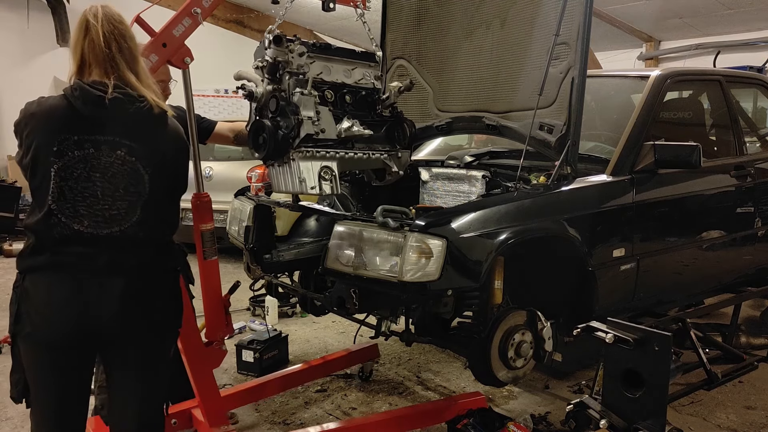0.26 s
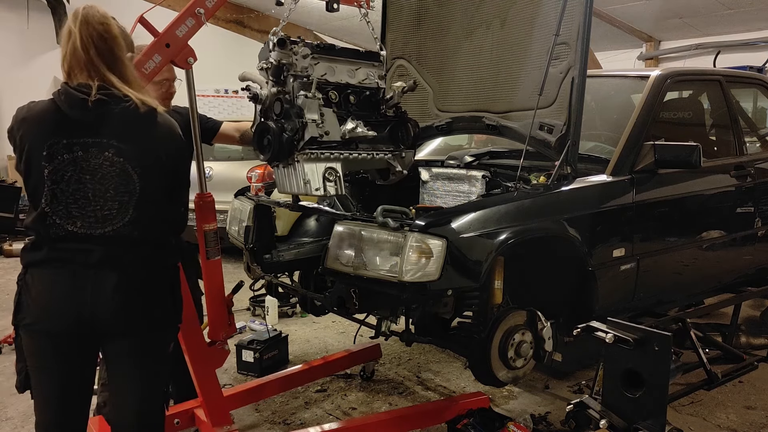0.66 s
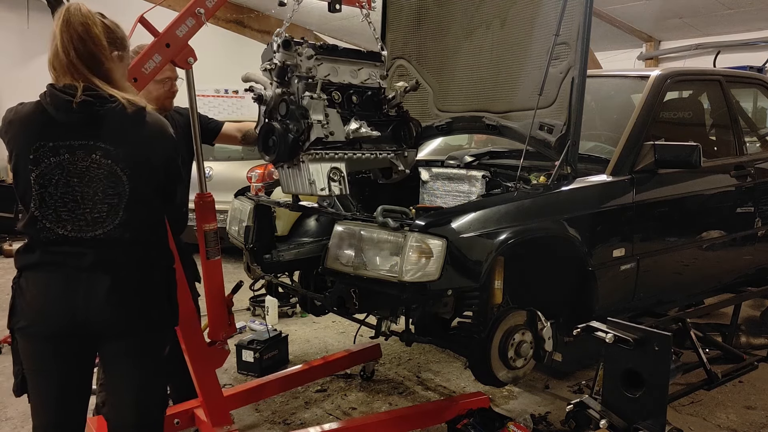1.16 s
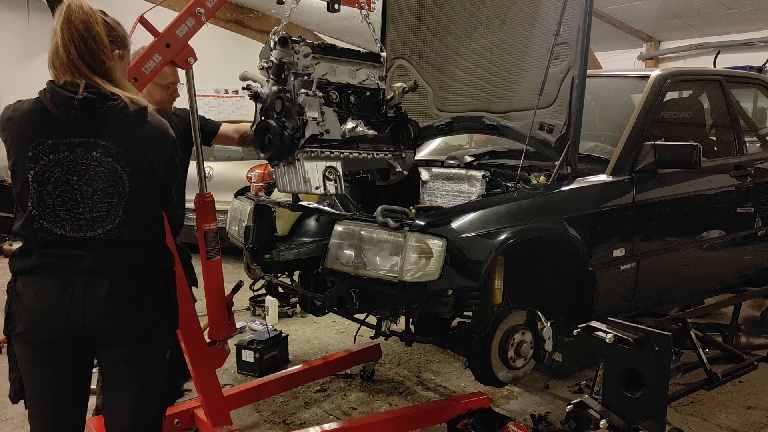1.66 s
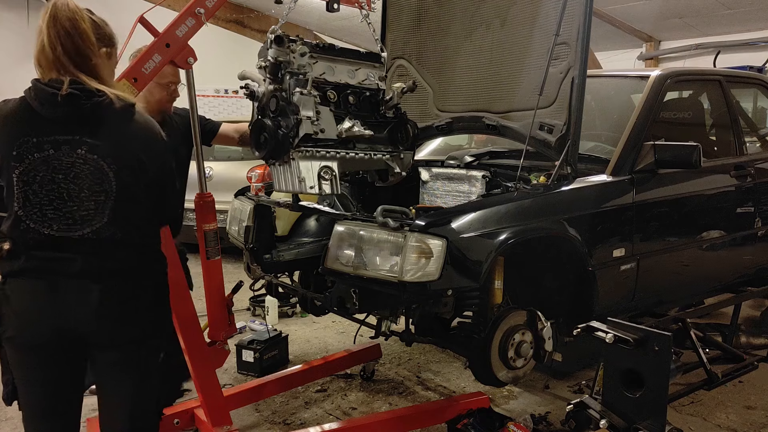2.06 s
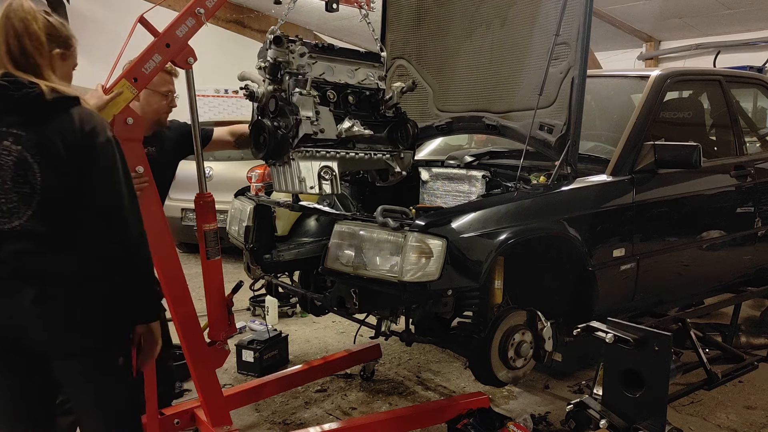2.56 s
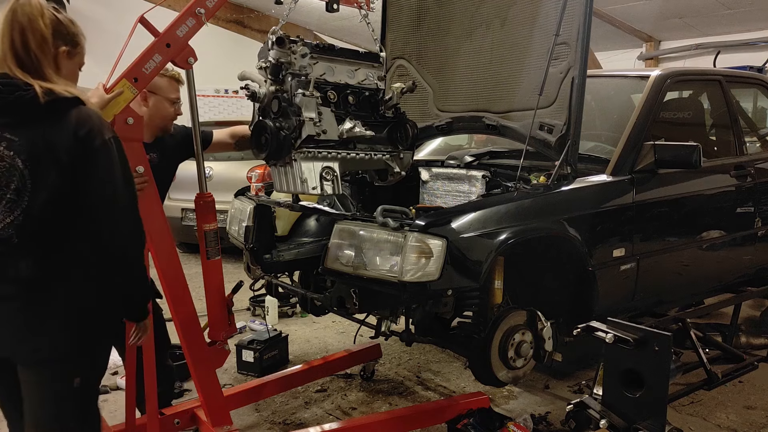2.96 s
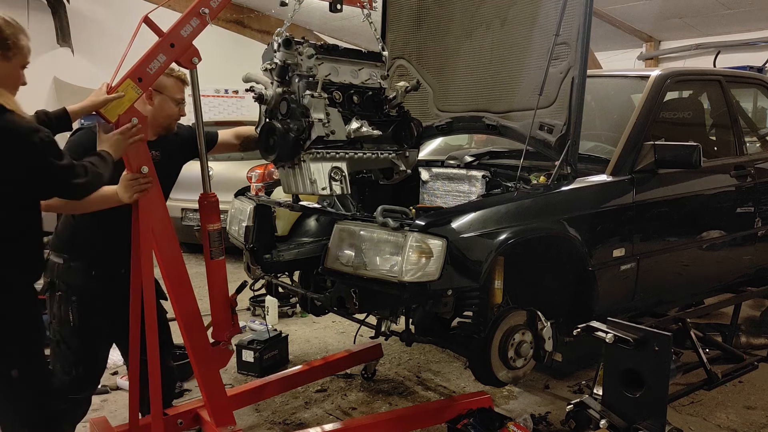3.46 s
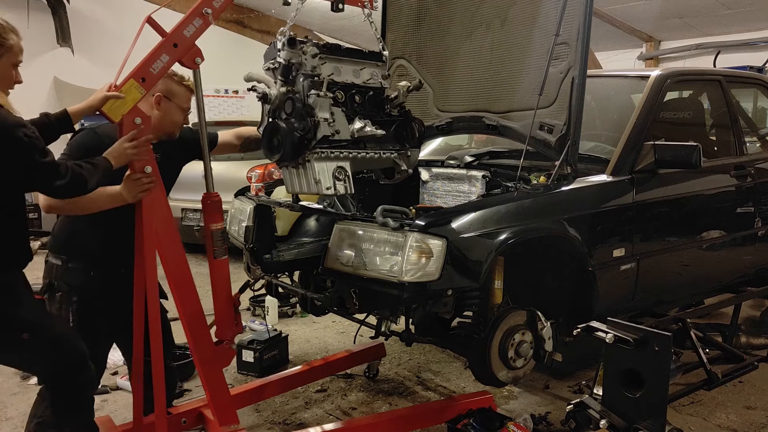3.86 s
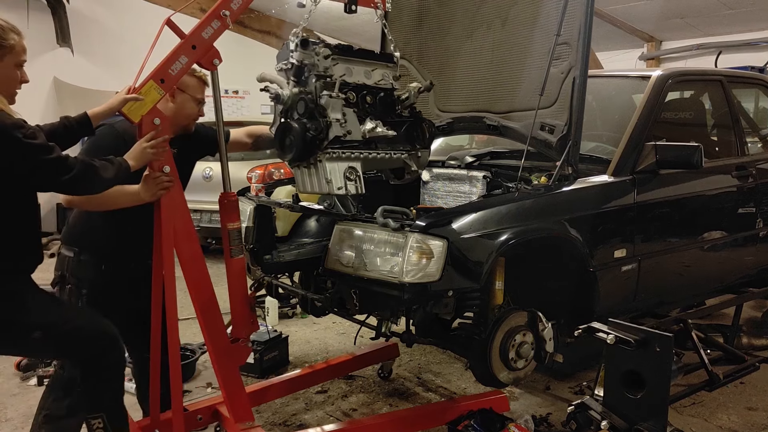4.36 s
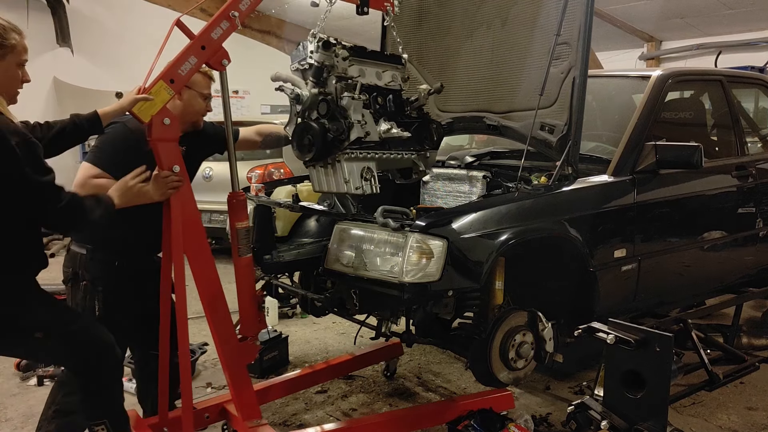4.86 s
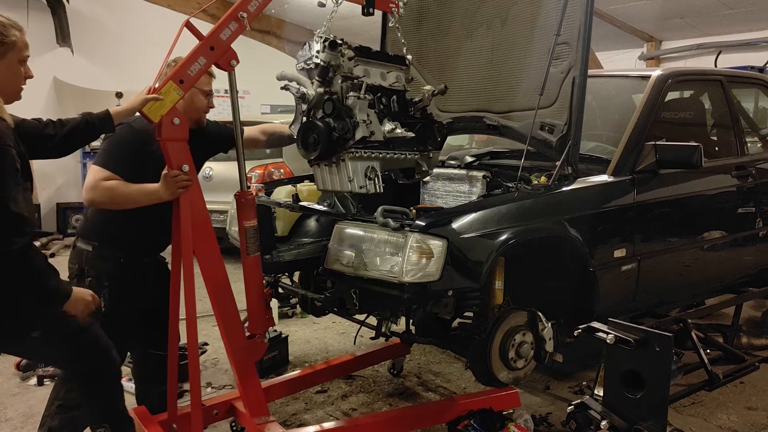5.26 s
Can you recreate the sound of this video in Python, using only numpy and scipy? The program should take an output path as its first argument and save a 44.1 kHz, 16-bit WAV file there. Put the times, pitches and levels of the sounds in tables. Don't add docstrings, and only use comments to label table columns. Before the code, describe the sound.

In a small bare-walled workshop, a rolling engine hoist jolts with a quick cluster of metal knocks, boot thump and thin squeaks. Sparse, faint hook clinks follow over a low hum. Then the casters drag again, a hard heel lands, and a loud clank of engine and frame breaks into rattles and scrapes. Stereo pickup from about three metres, crane slightly left.

```python
import sys
import numpy as np
from scipy import signal
from scipy.fft import rfft, irfft, next_fast_len
from scipy.io import wavfile
from scipy.ndimage import uniform_filter1d

SR = 44100
rng = np.random.default_rng(int(sys.argv[2]) if len(sys.argv) > 2 else 0)


def decibels_to_gain(level_db):
    exponent = np.asarray(level_db, float) / 20
    return 10 ** exponent


def unload_wav(signal):
    wavfile.write(
        sys.argv[1],
        SR,
        np.round(np.clip(np.atleast_2d(signal).T, -1, 1) * 32767).astype(np.int16),
    )


N = 243255

# start in seconds, hold in seconds, grind level in dB, rumble in dB, brightness in dB.
PUSHES = [(0.278, 0.071, -54, -0.5, 2.5), (0.435, 0.11, -73, 1, 1), (2.551, 0.33, -90, 3, 13),
          (3.025, 0.039, -99, 6, 19.5), (3.163, 0.035, -58, -6, -2), (3.406, 0.048, -72, -12, 4),
          (3.957, 0.033, -52, 4, 1), (4.041, 0.038, -38, -7.5, -1.5), (4.128, 0.11, -50, -15, 2),
          (4.347, 0.15, -91.5, 14.5, 21), (4.592, 0.2, -54, -4.5, -0.5), (4.87, 0.091, -66.5, -24, 4),
          (5.088, 0.019, -43.5, -11, -3), (5.208, 0.079, -63, 2, 1.5), (5.255, 0.06, -57.5, -10.5, -6)]


def rms(x):
    return np.sqrt(np.mean(x ** 2))


def through(x, response):
    return signal.fftconvolve(np.atleast_2d(x), np.atleast_2d(response), axes=1)[:, :N]


def band(x, edges_hz, kind, order):
    return signal.sosfilt(signal.butter(order, edges_hz, kind, fs=SR, output="sos"), x)


def shade(points, hz):
    point_hz, value = np.transpose(points)
    return np.interp(np.log(np.maximum(hz, 1)), np.log(point_hz), value)


def colour(x, points):
    size = next_fast_len(N)
    hz = np.arange(size // 2 + 1) * SR / size
    return irfft(rfft(x, size) * decibels_to_gain(shade(points, hz)), size)[..., :N]


def ring(modes, apart_hz=2000, rise_s=0.000083, count=1):
    hz, db, t60_s = np.transpose(modes)[:, :, None]
    t = np.arange(SR // 4) / SR
    swing = np.exp((2j * np.pi * hz - np.log(1000) / np.clip(t60_s, 0.01, 0.22)) * t)
    bodies = []
    for start, turn in rng.uniform(-np.pi, np.pi, (count, 2, len(modes), 1)):
        turn = turn * np.clip(hz / apart_hz, 0, 1) * 0.37
        weight = decibels_to_gain(db) * np.exp(1j * (start + turn * [1, -1]))
        both = np.imag(weight.T @ swing) * (1 - np.exp(-t / rise_s))
        bodies.append(both / (2 * rms(both[:, :SR // 200])))
    return bodies if count > 1 else bodies[0]


def steady(response):
    return response / np.sqrt(np.mean(np.sum(response ** 2, axis=1)))


def chatter(start_s, db, length_s, rise_s):
    out = np.zeros(N + SR)
    t = np.arange(SR // 6) / SR
    rise_s = rise_s + 0 * start_s
    contacts = rng.laplace(size=(len(start_s), len(t)))
    for s, gain, length, swell, grains in zip(start_s - 0.0015, decibels_to_gain(db), length_s, rise_s, contacts):
        push = grains * (1 - np.exp(-t / swell)) * np.exp(-t / max(length, 0.0002))
        at = int(s * SR)
        out[at:at + len(t)] += gain * push / np.sqrt(np.sum(push ** 2))
    return out[:N]


def tapped(taps, modes, length_s):
    s, db = np.transpose(taps)
    return through(chatter(s, db, length_s + 0 * s, length_s), ring(modes, rise_s=0.00037))


def walk(rate_hz):
    k = int(SR / rate_hz)
    return uniform_filter1d(np.repeat(rng.standard_normal(N // k + 1), k), k)[:N]


def drag(db, rough_db, rate_hz):
    return decibels_to_gain(db + rough_db * walk(rate_hz)) * rng.standard_normal(N)


def effort(s, hold_s, db, rise_db_s, fall_db_s):
    s, hold_s, db, fall_db_s = (np.reshape(v, (-1, 1)) for v in (s, hold_s, db, fall_db_s))
    t = np.arange(0, N, 32) / SR
    before_s = np.maximum(s - t, 0)
    after_s = np.maximum(t - s - np.abs(hold_s), 0)
    level = db - rise_db_s * before_s - np.abs(fall_db_s) * after_s
    return np.interp(np.arange(N) / SR, t, level.max(axis=0))


def pushing(lean_db):
    s, hold_s, db = np.transpose(PUSHES)[:3]
    return effort(s, hold_s, db + lean_db, rise_db_s=303, fall_db_s=158)


def shop():
    # frequency in Hz, density in dB per Hz.
    air_shape = [(25, -9), (55, -5.5), (80, -23.5), (160, -20.5), (300, -29.5), (700, -32), (1250, -36),
                 (1800, -36.5), (3200, -38.5), (5100, -40), (7000, -51), (11200, -40.5), (13000, -49),
                 (15600, -36.5), (16500, -42)]
    # time in seconds, level in dB.
    blower = [(0.0, -69.5), (0.23, -59.5), (0.68, -75.5), (1.03, -70.5), (1.858, -78.5), (2.18, -86),
              (2.589, -78.5), (3.89, -76.5), (4.02, -65), (4.451, -76.5), (4.81, -69.5), (5.52, -77)]
    air_db, hum_db, hum_hz, hum_width_hz = -71.5, -62.5, 44.0, 7.9
    t = np.arange(N) / SR
    mid, side = colour(rng.standard_normal((2, N)), air_shape)
    side = side - uniform_filter1d(side, size=60) * 0.37
    air = np.array([mid + side, mid - side]) * decibels_to_gain(walk(2.9))
    upper = air - uniform_filter1d(air, size=400)
    drone = 0.5 * np.sin(2 * np.pi * hum_hz * t)
    edges_hz = [hum_hz - hum_width_hz / 2, hum_hz + hum_width_hz / 2]
    throb = band(rng.standard_normal(N), edges_hz, "band", 2)
    hum = decibels_to_gain(hum_db) * (drone + 0.5 * throb / rms(throb))
    blower_db = np.interp(t, *np.transpose(blower))
    rumble = band(drag(blower_db, rough_db=3.0, rate_hz=17.0), [60, 150], "band", 2)
    return air * decibels_to_gain(air_db) / rms(upper) + decibels_to_gain(22.5) * rumble + hum


def boots():
    # start in seconds, peak in dB.
    steps = [
        (0.139, -19.5),
        (2.38, -26),
        (2.71, -39),
        (3.084, -70),
        (3.531, -55),
        (3.88, -12.5),
    ]
    slab_hz, slab_t60_s, sand_db = 512, 0.051, -27
    out = np.zeros(N + SR)
    t = np.arange(SR // 8) / SR
    spreads = rng.uniform(-1.021, 1, (len(steps), 2, 40, 1))
    sands = rng.standard_normal((len(steps), len(t)))
    for (s, db), (spread, start), sand in zip(steps, spreads, sands):
        fade = decibels_to_gain(1.3 * spread - 60 * t / slab_t60_s)
        mode_hz = slab_hz * 2 ** (1.3 * spread)
        knock = np.sum(np.sin(2 * np.pi * mode_hz * t + 2.0 * start) * fade, axis=0)
        knock = knock * (1 - np.exp(-t / 0.00027))
        crush = decibels_to_gain(sand_db - 60 * t / 0.25) * uniform_filter1d(sand, size=8)
        at = int((s + 0.00365) * SR)
        out[at:at + len(t)] += decibels_to_gain(db - 6.0) * (knock / np.abs(knock).max() + crush)
    return out[:N]


def grit():
    # start in seconds, peak in dB.
    ticks = [(0.1404, -73), (0.2674, -67), (0.377, -49), (0.5294, -32), (1.333, -64.5), (1.848, -67),
             (2.389, -67), (2.718, -70), (2.949, -58), (3.018, -61), (3.34, -64), (3.527, -68),
             (3.6196, -62.5), (3.9554, -58), (4.066, -58), (4.3171, -65), (4.535, -55), (4.7376, -45),
             (4.885, -52), (5.056, -77), (5.2424, -55), (5.4375, -78)]
    # frequency in Hz, density in dB per Hz.
    tick_shape = [(2000, -44), (4500, -3.5), (7000, 1), (9500, -1), (13000, -7), (15500, -3),
                  (16500, -21.5)]
    # start in seconds, hold in seconds, level in dB.
    scuffs = [(0.373, 0.07, -68), (2.566, 0.24, -78.5), (2.974, 0.021, -70.5), (3.364, 0.1, -80),
              (3.668, 0.02, -93), (4.08, 0.05, -52), (4.342, 0.014, -64), (4.39, 0.04, -70.5),
              (4.89, 0.075, -73), (5.2, 0.11, -70)]
    # frequency in Hz, density in dB per Hz.
    sole_shape = [(2000, -38), (4500, -1), (7000, -3), (10500, -4.5), (11500, -10), (15500, -3)]
    s, db = np.transpose(ticks)
    click = chatter(s, db + 29.5, 0.0006 + 0 * s, rise_s=0.00016) * decibels_to_gain([[1.5], [-1.5]])
    soles_db = effort(*np.transpose(scuffs), rise_db_s=260, fall_db_s=209)
    scuff = np.array([drag(soles_db, rough_db=7.0, rate_hz=47) for port in "LR"]) * decibels_to_gain(11.5)
    return colour(click, tick_shape) + colour(scuff, sole_shape)


def snaps():
    # start in seconds, peak in dB.
    cracks = [(.528, -41), (1.334, -52), (2.7185, -36), (2.772, -44), (2.946, -46), (3.348, -66),
              (3.408, -57), (3.531, -55), (4.553, -52), (4.887, -46)]
    # frequency in Hz, density in dB per Hz.
    crack_shape = [(400, -20), (900, -1), (2500, -3), (5000, 7), (7000, -5.5), (12000, -19.5)]
    s, db = np.transpose(cracks)
    return colour(chatter(s, db + 15, 0.0004 + 0 * s, rise_s=0.0002), crack_shape)


def fittings():
    # frequency in Hz, level in dB, t60 in seconds.
    pin, tray, collar = [(882, -5, 0.29), (902, -0.5, .2), (1358, -11.5, 0.088), (2000, -8, 0.088)], [(563, -7, 0.063), (722, 0, 0.052), (826, 0, 0.068)], [(2096, -0.5, .07), (2340, -6, .05), (1620, -7.5, .07)]
    shackle, race = [(3840, -5.5, .05), (3970, 0.5, 0.063), (4060, -3, 0.055), (5060, -8, .06),
                     (2900, -14.5, .06)], [(11980, 3, 0.044), (13700, -7, .03), (15350, -2, .03)]
    # start in seconds, peak in dB.
    pin_taps, tray_taps, collar_taps = [(.143, -33), (.528, -44), (.585, -52), (4.335, -42), (4.893, -43)], [(3.09, -67), (3.533, -45.5), (3.55, -65),
                                                          (4.083, -23.5)], [(.15, -37), (.275, -45),
                                                                             (.356, -42.5), (2.632, -52),
                                                                             (2.642, -54), (3.4, -58),
                                                                             (4.6, -56), (4.685, -49),
                                                                             (4.95, -47), (5.03, -44),
                                                                             (5.115, -31)]
    shackle_taps, race_taps = [(.143, -35), (.212, -36), (.305, -55), (.35, -46), (3.96, -32), (3.985, -31),
                               (4.03, -44), (4.075, -22), (4.325, -33), (4.35, -46), (4.67, -40),
                               (4.715, -27.5), (4.73, -46), (5.045, -46), (5.105, -34.5), (5.25, -50)], [(.148, -46), (.218, -60), (.272, -59), (.302, -28.5),
                                                     (.33, -57), (5.11, -57.5)]
    out = tapped(pin_taps, pin, length_s=0.00067)
    out = out + tapped(tray_taps, tray, length_s=0.00072)
    out = out + tapped(collar_taps, collar, length_s=0.0026)
    out = out + tapped(shackle_taps, shackle, length_s=0.0024)
    return out + tapped(race_taps, race, length_s=0.0054)


def loose_parts():
    # frequency in Hz, level in dB, t60 in seconds.
    lever, eye, strut = [(892, -0.5, 0.098), (1103, -6.5, 0.076), (2060, -9.5, 0.044)], [(778, -10, 0.14), (861, -7, 0.11), (1123, -1.5, 0.1)], [(970, -10, .1), (1247, -23, 0.062), (1314, -12.5, .12),
                                                     (1398, 3.5, 0.11), (1479, -1.5, 0.049),
                                                     (1525, -5, 0.25), (1809, -14, 0.057),
                                                     (2090, -8.5, 0.2), (3800, -10, .08)]
    leg, block = [(167, 6.5, 0.1), (237, -1.5, 0.16), (300, -1, 0.073), (428, -3, 0.19), (483, 1.5, 0.13),
                  (580, -3, 0.038), (671, -4, 0.36)], [(229, -10, 0.18), (788, 0.5, 0.06), (960, -20, 0.25), (1190, -27, .2),
                               (1430, -25, .08), (1550, -1.5, 0.19), (1800, -10, 0.19), (1990, -5, 0.25),
                               (2060, -12, 0.27), (2230, 2, 0.1), (2430, -7.5, 0.11), (2838, -4, 0.16),
                               (3960, -6, 0.074), (4170, -22, 0.07)]
    # start in seconds, peak in dB.
    raps, eye_taps, strut_taps = [(.142, -28), (.528, -38.5), (.272, -30), (3.536, -55.5), (4.331, -33),
                                  (4.89, -36.5)], [(.79, -67), (1.065, -57.5), (1.1, -57), (1.21, -64),
                                                (1.248, -55), (1.485, -61), (1.52, -62), (1.66, -61.5),
                                                (1.86, -66), (2.03, -62.5), (3.83, -52), (4.335, -32.5),
                                                (4.9, -41)], [(.21, -37), (.272, -41), (.336, -34.5),
                                                                  (2.718, -48), (2.75, -53), (2.945, -45),
                                                                  (2.967, -65), (3.174, -36), (3.19, -37),
                                                                  (3.206, -51), (3.27, -59), (3.445, -52),
                                                                  (3.93, -43), (4.66, -35), (4.722, -26),
                                                                  (4.8, -49), (4.95, -46), (5.062, -43),
                                                                  (5.1, -30.5), (5.14, -31), (5.18, -32),
                                                                  (5.27, -39), (5.33, -40)]
    leg_taps, block_taps = [(2.385, -51), (3.54, -62), (3.886, -34), (3.92, -34), (4.095, -26),
                            (4.62, -45.5), (4.77, -38), (5.15, -38.5), (5.18, -35), (5.29, -57)], [(4.077, -17), (4.087, -15), (4.106, -21), (4.13, -25),
                                              (4.16, -27.5)]
    out = tapped(raps, lever, length_s=0.00015)
    out = out + tapped(eye_taps, eye, length_s=0.0045)
    out = out + tapped(strut_taps, strut, length_s=0.00096)
    out = out + tapped(leg_taps, leg, length_s=0.00031)
    return out + tapped(block_taps, block, length_s=0.0011)


def axles():
    # start in seconds, level in dB, fade in dB per second.
    squeaks = [(0.147, -51, 296), (0.217, -42, 900), (0.271, -36.5, 1514), (0.301, -35.5, 302),
               (3.149, -54, 300), (3.184, -48, 801), (3.94, -50, 297), (3.977, -40.5, 550),
               (4.109, -43, 232), (4.228, -50, 693), (4.326, -57, 209), (4.539, -60.5, 156),
               (4.672, -50, 407), (4.718, -44, 346), (5.058, -43, 456), (5.109, -36, 420), (5.36, -53, 920),
               (5.41, -61, 137)]
    # frequency in Hz, level in dB, t60 in seconds.
    axle_modes = [(9410, 13.5, 0.033), (9574, 9.5, 0.023), (9255, 5.5, .03), (10200, -21, 0.036),
                  (10500, -17, 0.032), (12400, -5.5, 0.036), (11800, -15, .04), (13400, -17, .04),
                  (13700, -1.5, 0.022), (15400, 4.5, 0.035), (15500, -2, 0.039)]
    s, db, fade_db_s = np.transpose(squeaks)
    slip_db = effort(s, 0, db, 1213, fade_db_s)
    sing_db = pushing(-9.5)
    slips = drag(np.maximum(slip_db, sing_db), rough_db=4.5, rate_hz=60)
    body = ring(axle_modes, apart_hz=60500, rise_s=0.0012)
    return through(slips, steady(body)) * decibels_to_gain([[1.5], [-6.0]])


def frame():
    # start in seconds, peak in dB, thud in dB, clank in dB, clang in dB.
    knocks = [(0.141, -31.5, -0.5, -16, 2), (0.152, -27, -33, 1.5, -10), (0.209, -26, -23, -4, -5),
              (0.271, -32.5, -5.5, 7, -14.5), (0.335, -26.5, -18, -4.5, -18), (0.377, -30.5, -28, -15, -8),
              (0.526, -38, -26, -22.5, -5), (1.332, -61.5, -8, -12, -4), (2.633, -63, -23, -3, 6),
              (2.642, -76, -21, 4, -6), (2.718, -39.5, -31, -14, -10), (2.945, -40.5, -26, -7, -3.5),
              (2.967, -43, -11, -18, -5), (3.105, -54, -22, -18, -7), (3.086, -51.5, -1, -5, -6),
              (3.241, -53, -7, -2, 12.5), (3.402, -63, -9, 17.5, -4), (3.535, -54.5, -22, -24, -3),
              (3.957, -31, -18, -6, -4), (4.03, -40.5, -12, 3, 5.5), (4.083, -19.5, -4, 4, 0.5),
              (4.328, -41.5, -49, -16, 20), (4.55, -43, -34, -13, 9.5), (4.585, -57, -21, 6, -15),
              (4.894, -36, -15, -22.5, -4.5), (5.044, -48, -25, 9, 7.5), (5.057, -31, -4, 1.5, -22),
              (5.096, -26.5, -10, 0.5, -5.5), (5.242, -41, -14, -20, 6)]
    # start in seconds, peak in dB, thud in dB, clank in dB, clang in dB.
    skids = [(0.047, -57, -32, -6, -9), (0.179, -30, -4.5, 1.5, -12), (0.309, -34, -10, 0, -14),
             (0.872, -61.5, -12, -13, -22), (1.698, -58, -3.5, -20, -6.5), (1.846, -50, -7, -3, -0.5),
             (2.382, -48, 3, 0, 0.5), (2.723, -44.5, -29, -2.5, -0.5), (2.756, -42.5, -19, -7, -4),
             (2.949, -46, -12, -6, -6), (3.189, -40.5, -18, 6, -4), (3.338, -57, 1, -5, 0),
             (3.459, -55, -30, -15, 3), (3.608, -65.5, -16, -5, 11.5), (4.071, -19.5, -7.5, 6.5, 2.5),
             (4.11, -30, -13, 13.5, 5), (4.316, -44, -25, 8, 21.5), (4.657, -36.5, -5.5, -5, -7),
             (4.681, -29.5, -14, -1.5, -7), (4.718, -28.5, -9, -7.5, 0), (5.119, -39, -6, -3, -19),
             (5.159, -40, 5, -4, -26), (5.355, -54, -27, 7, -10), (5.436, -47, -25, 3, 7),
             (3.974, -36.5, -9, -14, 0.5)]
    # start in seconds, peak in dB, thud in dB, clank in dB, clang in dB.
    slides = [(0.238, -42.5, -2.5, 11.5, -16), (0.561, -64, -26, -22, -25), (2.578, -68, -1, 4, -4),
              (3.16, -35.5, -29, -8, -5.5), (4.384, -39.5, -22, -26, 6.5), (4.934, -38.5, -25, -4.5, -14)]
    # centre in Hz, half width in octaves, t60 in seconds.
    parts = [(286.8, 1.3, 0.08), (845, 0.896, 0.054), (1893.7, .8, 0.066), (4022, .9, 0.052)]
    # frequency in Hz, level in dB, t60 in seconds.
    beams = [(231, -18.5, 0.071), (466.6, -6, 0.22), (768, -10.5, 0.26), (894, -9, 0.28),
             (959.8, -8.5, 0.27), (1114, -4.5, 0.11), (1426, -8, 0.3), (1595, -16.5, 0.1),
             (1900, -25, 0.214), (1962, -31, 0.2), (2110, -19, 0.11), (2156, -15, 0.15),
             (2494, -13.5, 0.23), (2945, -19.5, 0.08), (3960, -16.5, 0.087)]
    # frequency in Hz, density in dB per Hz.
    frame_shape = [(110, -17.5), (230, -10.5), (400, -9), (630, -9.5), (850, -3.5), (1150, -5.5),
                   (1450, -4.5), (2000, -1), (2700, -9), (3800, -3.5), (4500, -7), (6500, -17.5),
                   (8000, -40)]
    s, db, thud_db, clank_db, clang_db = np.transpose(knocks + skids + slides)
    length_s = np.repeat([0.0031, 0.019, 0.021], [len(knocks), len(skids), len(slides)])
    rise_s = 0.0014 + 0.15 * length_s
    rumble_db, bright_db = np.transpose(PUSHES)[3:]
    leans_db = rumble_db, 0, 2 + bright_db, -7.5 + 1.76 * bright_db
    blows_db = thud_db, 0, clank_db, clang_db
    out = 0
    for (centre_hz, octaves, t60_s), part_db, lean_db in zip(parts, blows_db, leans_db):
        place, scatter, life = rng.random((3, 150))
        place = (np.arange(len(place)) + place) / len(place)
        plate_hz = centre_hz * 2 ** (octaves * (2 * place - 1))
        plates = np.transpose([plate_hz, -6 * scatter - 7, t60_s * (0.47 + 1.29 * life)])
        modes = np.vstack([plates, beams])
        off = np.log2(modes[:, 0] / centre_hz) / octaves
        modes[:, 1] += shade(frame_shape, modes[:, 0]) + 3 * off * octaves - 9 * off ** 4
        for spot, body in enumerate(ring(modes, count=3)):
            mine = slice(spot, None, 3)
            even = steady(body)
            blows = chatter(s[mine], (db + part_db)[mine], length_s[mine], rise_s[mine])
            blows = blows * rms(body) / rms(even)
            grind = decibels_to_gain(-4.5) * drag(pushing(lean_db), rough_db=5.5, rate_hz=140)
            out = out + through(blows + grind, even)
    return out


def hook():
    # start in seconds, peak in dB, shank ring in dB, link ring in dB, chatter in seconds.
    clinks = [(0.404, -48, -15, -16, 0.0043), (0.6526, -46, -13, -8, 0.013),
              (0.79, -60.5, -8.5, -9.5, 0.085), (1.0539, -43, -16.5, -9, 0.013),
              (1.2074, -56.5, -12.5, -9, 0.018), (1.237, -50, -17.5, -1, 0.0025),
              (1.476, -42.5, -16, -9, 0.0068), (1.617, -64, -12, -16, 0.0041),
              (1.664, -64, -2.5, -4, 0.026), (1.8951, -48, -11.5, -15.5, 0.005),
              (2.03, -69, 0.5, -3, 0.0099), (2.292, -42.5, -22, -29, 0.0072),
              (3.1848, -35, -18, -11, 0.0045), (3.2416, -42.5, -8.5, -11, 0.004),
              (3.4235, -38, -17.5, -13.5, 0.0055), (3.5732, -52.5, -12, -17.5, 0.0056),
              (3.8183, -40, -17.5, -8, 0.025), (4.3183, -37.5, -15, -10, 0.042),
              (4.4866, -51.5, -9, -5, 0.017), (4.557, -54, -5, 4, 0.059), (4.885, -45, -21, -5, 0.002),
              (5.2431, -51.5, 2.5, 4.5, 0.048), (5.435, -36.5, -17.5, -11, 0.0071)]
    # start in seconds, peak in dB, shank ring in dB, link ring in dB, chatter in seconds.
    bounces = [(0.689, -57, -19, -16, 0.0035), (1.091, -48.5, -23, -6.5, 0.0046),
               (1.128, -74, -21, -19, .004), (1.279, -62, -25, -11, 0.0042),
               (1.513, -52.5, -15.5, -7, 0.0025), (1.542, -68, -20, -19, .004),
               (1.933, -65.5, -3, -14, .005), (2.321, -64, -8, -25, .004), (3.266, -55, -5, -23, 0.0034),
               (3.46, -57, -13, -4, 0.0038), (3.854, -53, -0.5, -17, .005), (5.453, -51, -20, -13, 0.0041)]
    # frequency in Hz, level in dB, t60 in seconds.
    hook_modes = [(1336, -4.5, 0.1), (1366, -3.5, 0.061), (1602, -11.5, 0.098), (1148, -11, 0.098),
                  (2460, -11.5, 0.031), (2960, -16, 0.085), (3053, 0, 0.061), (3077, -8.5, 0.05),
                  (7120, -19.5, 0.046), (3845, 3, 0.039), (3897, -6, 0.026), (4450, -13, 0.032),
                  (5110, -7, 0.072), (5560, -5, 0.03)]
    s, db, shank_db, link_db, length_s = np.transpose(clinks + bounces)
    out = 0
    for low_hz, high_hz, part_db in ((0, 2000, shank_db + 8), (2000, 3300, 0), (3300, 9000, link_db + 8)):
        modes = [m for m in hook_modes if low_hz < m[0] <= high_hz]
        body = ring(modes, rise_s=0.0004)
        blows = decibels_to_gain(2.5) * chatter(s, db + part_db, 0.66 * length_s, rise_s=0.00095)
        out = out + through(blows, body)
    return out


def walls(x):
    # frequency in Hz, t60 in seconds.
    decay = [(250, 0.24), (1000, 0.31), (4000, 0.25), (12000, 0.16)]
    t = np.arange(int(0.6 * SR)) / SR
    hz = np.fft.rfftfreq(len(t), 1 / SR)
    noise = rfft(rng.standard_normal((2, len(t))))
    noise[1] = np.where(hz < 450, noise[0], noise[1])
    tail = 0
    for centre_hz in 60 * 2.0 ** np.arange(9):
        share = np.clip(1 - np.abs(np.log2(np.maximum(hz, 1) / centre_hz)), 0, 1)
        tail = tail + irfft(noise * share, len(t)) * decibels_to_gain(-60 * t / shade(decay, centre_hz))
    tail = tail * np.clip((t - 0.004) / 0.0038, 0, 1)
    return decibels_to_gain(-7) * through(x.mean(axis=0), steady(tail))


def scene():
    clinks, near = hook(), grit()
    crane = clinks + frame() + boots() + near + axles() + loose_parts() + fittings() + snaps()
    crane = band(crane, 130, "high", 4)
    return crane + walls(crane - 0.35 * clinks - 0.45 * near) + shop()


def top_cut(x):
    return signal.sosfilt(signal.butter(12, 16980, fs=SR, output="sos"), x)


def record(dry):
    right_lag_s = 0.00008
    size = next_fast_len(N)
    lag = np.exp(-2j * np.pi * np.fft.rfftfreq(size, 1 / SR) * right_lag_s)
    dry = signal.sosfilt(signal.ellip(8, 0.3, 60, 15800, fs=SR, output="sos"), dry)
    right = irfft(rfft(dry[1], size) * lag, size)[:N]
    return top_cut(np.array([dry[0], right]))


dry = scene()
out = record(dry)
unload_wav(out)
```